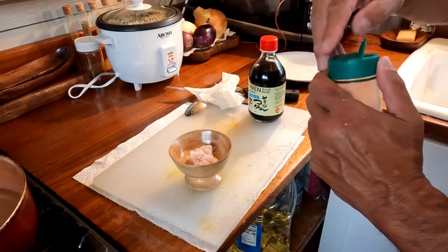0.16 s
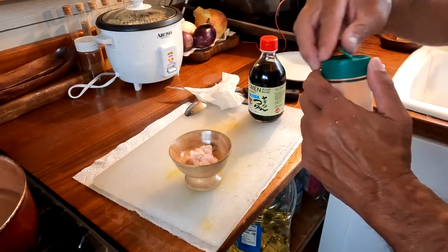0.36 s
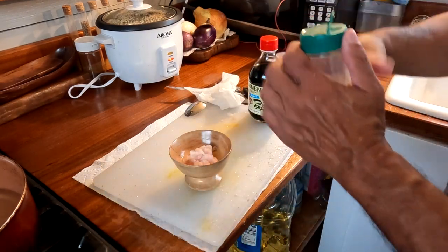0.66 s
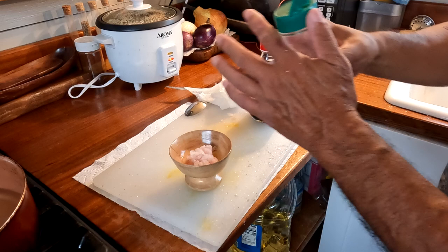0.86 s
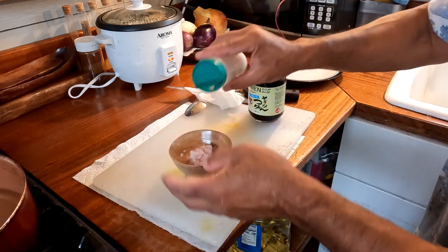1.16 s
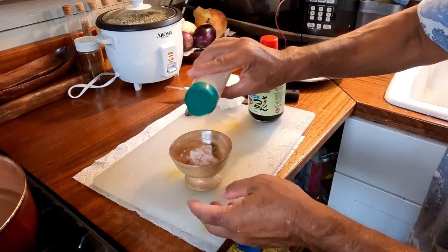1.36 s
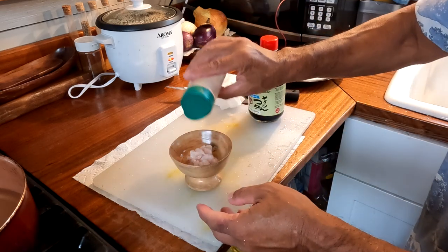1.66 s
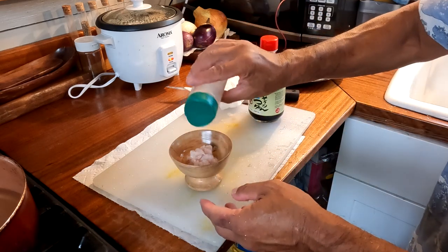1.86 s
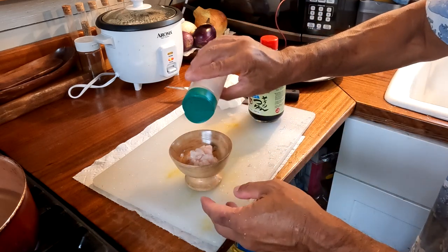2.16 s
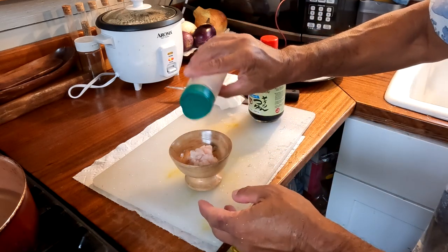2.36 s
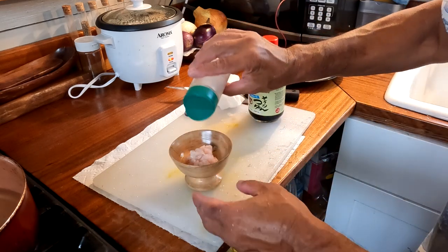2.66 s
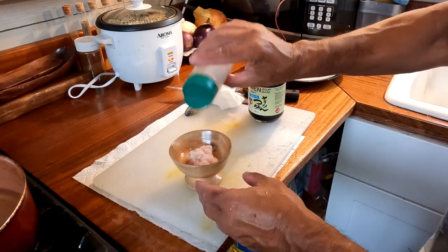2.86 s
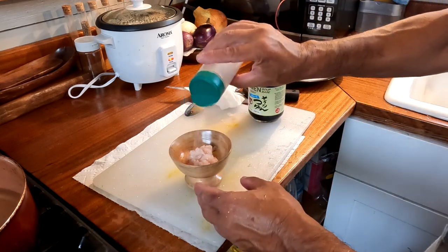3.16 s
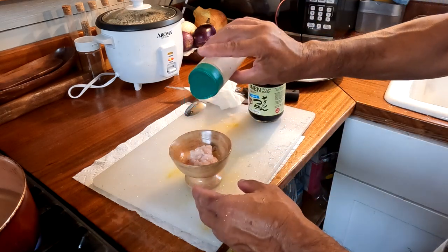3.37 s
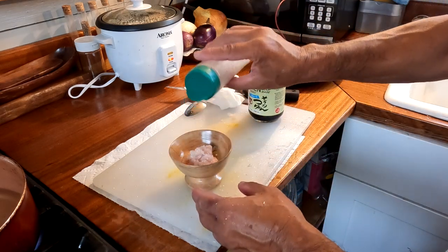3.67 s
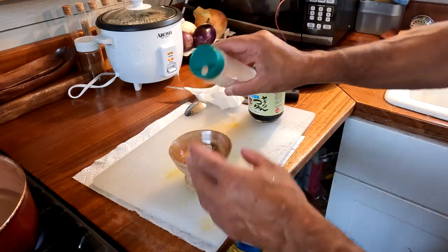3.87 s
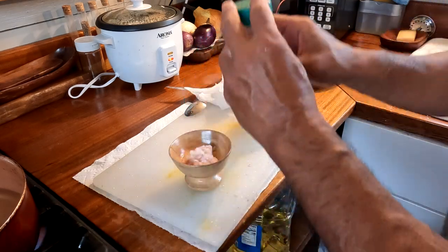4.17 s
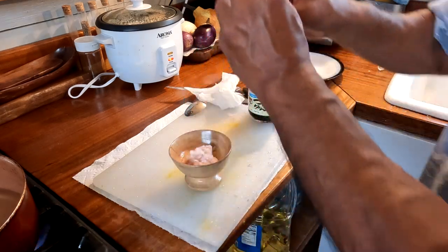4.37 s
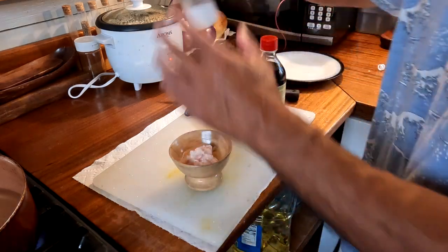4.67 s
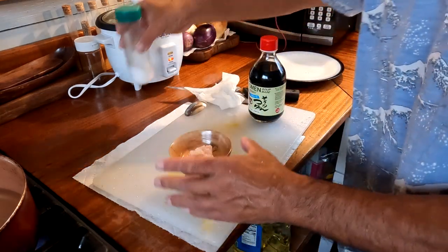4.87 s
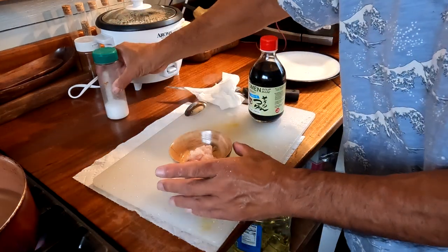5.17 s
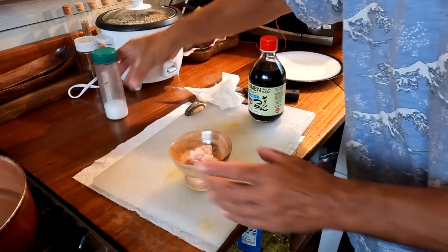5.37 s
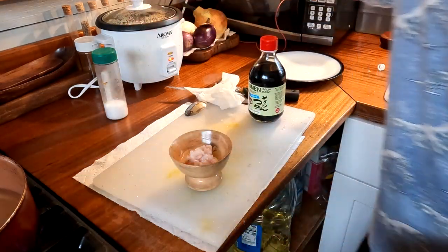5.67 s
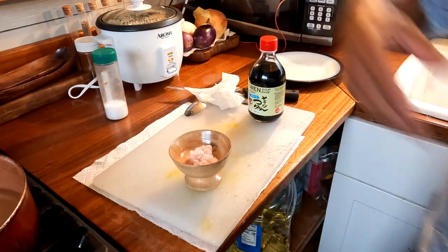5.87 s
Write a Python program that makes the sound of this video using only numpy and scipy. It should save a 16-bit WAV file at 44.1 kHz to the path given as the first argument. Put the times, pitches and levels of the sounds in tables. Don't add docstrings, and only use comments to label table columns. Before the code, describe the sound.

A close stereo microphone in a small, briefly echoing kitchen, over a steady low refrigerator hum, soft air and dull floor thuds. From 0 to 1 s, fingers handle a plastic salt shaker with slight grain shifts, faint clicks and a catch opening at 0.95. At 1.3 a bright rush of salt slides as it is tipped, then quick soft shakes patter until about 3.9, with small ticks and lumps, more pronounced after 3.2. At about 2.9 a deep bump swings and rattles the camera stand. Around 4.2 the salt swooshes back with soft finger taps; at 4.39 the lid snaps shut, the loudest, sharpest sound, with a burst of grains. Quieter handling follows, the level ducked. At 5.2 the tube lands on wood, a hollow rocking knock with a salt jolt. Light taps come near 5.6, barely audible sole squeaks at 5.8, and a hard clatter farther off at 6.02.

```python
import sys
import numpy as np
from scipy import signal
from scipy.io import wavfile
from scipy.ndimage import uniform_filter1d

SR = 44100
rng = np.random.default_rng(int(sys.argv[2]) if len(sys.argv) > 2 else 0)


def gain_from_decibels(decibels):
    exponent = np.asarray(decibels, float) / 20
    return 10 ** exponent


def waveform_to_disk(signal):
    frames = np.transpose(np.atleast_2d(signal))
    scaled = np.clip(frames, -1, 1) * 32767
    samples = np.round(scaled).astype(np.int16)
    wavfile.write(sys.argv[1], SR, samples)


N = 265923

# f/Hz, level/dB [dB per Hz]
PATTER = [(2650, -43.5), (4300, -16.5), (5250, -16), (6000, -6.5), (7240, 3), (7950, -0.5), (8720, -9.5),
          (9830, -17.5), (11100, -9), (11500, -9), (12600, -16), (14300, -28), (15500, -52)]
# f/Hz, level/dB [dB per Hz]
LID = [(250, -50), (420, -17), (702, -24), (1150, -14), (1300, -15), (1590, -10), (2110, 0), (2770, -4.5),
       (3800, 1.5), (5070, -16), (6860, 0.5), (7620, -6.5), (8860, -29), (10200, -27), (11800, -16),
       (13200, -24), (15000, -55)]
# t/s, gain/dB
GAIN = [
    (0.0, 0.4),
    (2.6, -0.3),
    (4.38, -1),
    (4.79, -7),
    (5.26, -5.5),
    (5.3, -12),
    (5.49, -9.5),
    (5.57, -6.5),
    (5.97, -6.5),
    (6.03, -14),
]
# t/s, deep level/dB, thud level/dB, die-away/s per 20 dB
STEPS = [(0.0, -55, -60, -0.2), (.4, -58, -56, .05), (.73, -63, -59, .05), (1.11, -60, -60, 0),
         (2.55, -56, -58, 0.05), (2.8, -54, -49.5, 0.09), (2.97, -37.5, -56, 0.15), (3.13, -43, -63, 0.04),
         (3.24, -57, -57, 0.04), (3.42, -46, -61, 0.2), (3.96, -51, -57.5, 0.24), (4.075, -60, -57, 0.09),
         (4.17, -53, -66, 0.4), (4.53, -56, -62, 0.2), (4.82, -48, -66, .2), (5.3, -44, -56.5, .2),
         (5.77, -49, -62, 0.2), (6.0, -44.5, -63, 0.2), (6.03, -38, -42, 0.05)]
STEP_RISE = .6


def salt():
    grain_tilts = [-9, 0, 9]
    # f/Hz, level/dB [dB per Hz]
    slide = [(500, -41.5), (900, -24), (1400, -14), (1900, -4.5), (2400, -6), (2900, -4.5), (4000, -6.5),
             (4600, -20), (5600, -30), (8000, -54)]
    ticking = np.zeros(N)
    for tilt in grain_tilts:
        clicks = grains(per_s=1700., spread_db=2.8)
        ticking += flutter(1.6, 900) * signal.oaconvolve(clicks, causal(tilted(PATTER, tilt)))[:N]
    patter_db, heap_db = motion()
    patter = gain_from_decibels(patter_db - 3.0) * flutter(1.3, 500) * ticking

    heap = grains(per_s=3300.0, spread_db=1.0)
    scrape = gain_from_decibels(heap_db - 1.5) * signal.oaconvolve(heap, causal(slide))[:N]
    rush_db = heap_db - 1.0 + 0.8 * np.clip(heap_db + 47.0, -30, 0)
    rush = gain_from_decibels(rush_db) * band(heap, 4330, 6300)

    tipped_s, grip_hz, grip_db = .95, 9500, -4.5
    top = signal.oaconvolve(patter, signal.firwin(101, grip_hz, pass_zero=False, fs=SR), "same")
    upright = np.arange(N) < tipped_s * SR
    patter = patter - (1 - gain_from_decibels(grip_db)) * upright * top
    top_hz = 14600
    patter = signal.oaconvolve(patter, signal.firwin(401, top_hz, window="blackman", fs=SR), "same")
    return patter + scrape + rush + air_column()


def air_column():
    start_hz, sag_hz_per_s, width_hz = 1910, 900, 60
    t = np.arange(N) / SR - 4.18
    pole = np.exp(-np.pi * width_hz / SR)
    waver = evened(signal.lfilter([1], [1, -pole], rng.standard_normal(N)))
    note = np.sin(2 * np.pi * t * (start_hz - sag_hz_per_s * t / 2))
    return gain_from_decibels(-50) * waver * note * np.exp(-(t / .08) ** 4)


def motion():
    # turning point t/s, patter level/dB, slide length/s
    shakes = [(1.04, -54.5, 0.08), (1.136, -57, 0.12), (1.426, -49, 0.006), (1.546, -50.5, 0.12),
              (1.734, -55.5, 0.019), (1.798, -52.5, 0.002), (1.898, -50, 0.032), (2.05, -51.5, 0.035),
              (2.119, -53, 0.041), (2.194, -54.5, 0.033), (2.274, -50, 0.005), (2.348, -52.0, 0.02),
              (2.429, -51.5, 0.003), (2.512, -51.0, 0.019), (2.592, -58, 0.007), (2.679, -50.5, 0.04),
              (2.817, -50.5, 0.02), (2.87, -56, 0.003), (2.991, -51.5, 0.049), (3.117, -50.5, 0.037),
              (3.173, -51.5, 0.029), (3.256, -52.5, 0.015), (3.423, -56, 0.046), (3.536, -54.5, 0.021),
              (3.609, -52.5, 0.02), (3.695, -59.5, 0.004), (3.754, -54.5, 0.002), (3.862, -58.5, 0.032)]
    # start t/s, patter level/dB, length/s
    trickle = (1.31, -63.5, 2.56)
    # peak t/s, patter level/dB, heap level/dB, swell and die-
    # away/s per 20 dB
    surges = [(0.0, -66, -58, 0.048, 0.07), (0.074, -54, -56, 0.008, 0.1), (0.097, -52, -55, 0.04, 0.05),
              (0.395, -68, -66, 0.006, 0.14), (0.672, -72, -65, 0.06, 0.08),
              (0.802, -63.0, -59.5, 0.12, 0.12), (1.312, -38.5, -48.5, 0.043, 0.16),
              (1.361, -48, -52, 0.08, 0.127), (2.869, -48.0, -47, 0.04, 0.1),
              (3.244, -67.5, -54, 0.1, 0.03), (4.038, -49.5, -50, 0.05, 0.39),
              (4.17, -33, -42, 0.1276, 0.108), (4.291, -46, -47, 0.008, 0.075),
              (4.349, -49.0, -55.5, 0.05, 0.045), (4.396, -31, -29, 0.008, 0.06),
              (4.436, -43, -44, 0.02, 0.045), (4.461, -60, -37.5, 0.006, 0.04),
              (4.605, -60.0, -58.5, 0.15, 0.078), (4.681, -61.5, -60.5, 0.014, 0.26),
              (4.887, -60.5, -61, 0.008, 0.07), (4.917, -55, -65.0, 0.037, 0.15),
              (5.048, -64.5, -54, 0.008, 0.08), (5.251, -34.5, -37, 0.0347, 0.05),
              (5.374, -70, -58, 0.015, 0.12), (5.768, -72, -67.5, 0.25, 0.13),
              (.989, -54, -59, .008, .12),
        (2.862, -54, -56, .008, .1),
        (5.203, -44, -50, .006, .09),
        (5.598, -74, -70, .01, .2),
        (5.69, -73, -67, .01, .2),
    ]
    rise_s, fall_s, stroke_heap_db = .079, 0.093, -8.5
    resting_db, resting_heap_db = -81, -74.5
    start, pour_db, length = trickle
    pour = (start + length / 2, pour_db, length)
    strokes = [(s, db, hold, rise_s, fall_s) for s, db, hold in shakes + [pour]]
    patter = list(strokes)
    heap = [(s, db + stroke_heap_db, *shape) for s, db, *shape in strokes]
    for s, patter_db, heap_db, rise, fall in surges:
        patter.append((s, patter_db, 0, rise, fall))
        heap.append((s, heap_db, 0, rise, fall))
    return swells(patter, resting_db), swells(heap, resting_heap_db)


def ticks():
    # t/s, peak level/dB, ring f/Hz, scuff t60/s
    pats = [(.0685, -40, 2100, .03), (.0745, -37, 2900, .04), (.08, -43, 3600, .03), (.092, -48, 2900, .02),
            (.413, -56, 2460, .01), (.7148, -46, 2210, .004), (.733, -45, 1930, .012),
            (4.164, -44, 2990, .05), (4.277, -31, 1830, .006), (4.2775, -36, 2400, .004),
            (4.279, -35, 1450, .01), (5.596, -55, 2290, .011), (5.63, -53.5, 3800, 0.02)]
    taps = [(.0345, -45.5, 3670, .002), (.2926, -54, 2970, .018), (.987, -50, 3500, .015),
            (1.005, -46, 4120, .005), (3.222, -51, 2500, .036), (3.2455, -42, 4100, .004),
            (3.48, -50, 4400, .004), (3.541, -50, 4300, .004), (3.794, -49, 4200, .004),
            (3.9717, -48, 3300, .006), (4.305, -44.5, 3480, .01), (4.552, -52, 1400, .051),
            (4.689, -49.5, 2100, .016), (4.884, -48, 2000, .008), (5.371, -54, 1100, .094),
            (5.685, -59, 3190, .033)]
    cracks = [
        (.945, -52, 2980, 0.015),
        (4.464, -34, 900, .05),
        (5.043, -47, 1490, .03),
    ]
    # t/s, peak level/dB
    lumps = [(.333, -57), (.393, -49), (.77, -56), (1.29, -38), (3.182, -41), (3.208, -44), (3.2455, -35),
             (3.27, -42), (3.395, -46), (3.435, -46), (3.503, -48), (3.511, -47), (3.71, -41), (3.748, -36),
             (3.864, -43.5), (3.9717, -47), (5.372, -54), (5.447, -60),
             (1.5533, -48),
        (1.8571, -50),
        (2.4164, -50),
        (2.5012, -45),
        (2.6379, -51),
        (2.9511, -48),
        (2.9856, -45),
        (3.0479, -54),
    ]
    pan_db = np.array([[-1.5], [1.5]])
    t = np.arange(2048) / SR
    lid = causal(LID)
    lid = lid / abs(lid).max()
    grain = causal(tilted(PATTER, 3))
    grain = grain / abs(grain).max() + gain_from_decibels(-9) * ring([(4250, 0, .006)])[:2048]
    grain = grain / abs(grain).max()
    lump_rows = [(s, db, 11200, .003) for s, db in lumps]
    kinds = [(pats, lid, -22), (taps, lid, -6), (cracks, lid, 0), (lump_rows, grain, 4)]
    sides = np.zeros((2, N))
    for rows, crack, crack_db in kinds:
        for s, db, hz, t60 in rows:
            body = gain_from_decibels(-60 * t / (.005 + .08 * t60)) * np.sin(2 * np.pi * hz * t)
            body += gain_from_decibels(crack_db) * crack
            add(sides, s, gain_from_decibels(db) * scuffed(body, t60) * gain_from_decibels(pan_db / 2))
    return sides


def lid_snap():
    # t/s, peak level/dB, scuff t60/s
    snaps = [
        (4.378, -50, .01),
        (4.3876, -6, 0.005),
        (4.389, -14, 0.0066),
        (4.3936, -13, 0.0034),
        (4.4105, -34, .006),
        (4.4605, -35, .008),
    ]
    # f/Hz, level/dB, t60/s
    lid_modes = [(1610, -10, .02), (2180, 0, .014), (2900, -6, .01), (3375, -3, .01), (4000, -1, .012),
                 (4320, -4, .012), (5900, -5, .015), (6300, -4, .015), (7010, -1, .018), (7400, -4, .015)]
    out = np.zeros(N)
    for s, db, t60 in snaps:
        add(out, s, gain_from_decibels(db) * scuffed(causal(LID), t60))
        add(out, s, gain_from_decibels(db - 7) * scuffed(ring(lid_modes), t60))
    return out


def tube_landing():
    # t/s, wood level/dB, plastic level/dB, scuff t60/s
    knocks = [
        (5.188, -52, -51, 0.026),
        (5.2003, -17.5, -22, .02),
        (5.208, -28, -17, .02),
        (5.2102, -25.5, -16, 0.012),
        (5.218, -25, -34, .04),
        (5.226, -23, -29, .03),
        (5.235, -27, -34, .03),
        (5.2447, -34.5, -32, 0.03),
    ]
    # f/Hz, level/dB, t60/s
    wood = [(138, -14, 0.15), (185, -8, 0.04), (293, 6, 0.1), (352, -18, 0.4), (423, 3, 0.045),
            (520, 2, .03), (620, -2, .03), (711, 0, 0.065), (942, -10, 0.04)]
    # f/Hz, level/dB [dB per Hz]
    tube = [(240, -15.5), (500, -8), (1200, -12), (1600, -14), (2020, -2), (2240, 0.5), (2600, -15),
            (3350, -5), (3900, -14), (4500, -30), (7100, -20.5), (9000, -40), (11600, -36), (15000, -55)]
    # f/Hz, level/dB, t60/s
    tube_modes = [(1640, -10, .03), (2030, -3, .03), (2240, -2, .025), (3260, 0, .03), (3460, -1, .03),
                  (3900, -5, .02)]
    out = np.zeros(N)
    for s, wood_db, tube_db, t60 in knocks:
        add(out, s, gain_from_decibels(wood_db) * scuffed(ring(wood), 0.35 * t60))
        add(out, s, gain_from_decibels(tube_db) * scuffed(causal(tube), t60))
        add(out, s, gain_from_decibels(tube_db - 10) * scuffed(ring(tube_modes), 0.4 * t60))
    return out


def palm_thumps():
    # t/s, peak level/dB, scuff t60/s
    thumps = [
        (.393, -50, .02),
        (.72, -54, .02),
        (4.037, -46, .03),
        (4.062, -40, .08),
        (4.11, -48, .05),
        (4.277, -45, .01),
        (4.389, -44, .02),
    ]
    # f/Hz, level/dB, t60/s
    hollow = [(190, -8, .04), (260, 0, .04), (350, -5, .03)]
    out = np.zeros(N)
    for s, db, t60 in thumps:
        add(out, s, gain_from_decibels(db) * scuffed(ring(hollow), t60))
    return out


def clatter():
    # t/s, peak level/dB
    rattles = [
        (6.018, -35),
        (6.023, -30.5),
    ]
    # f/Hz, level/dB [dB per Hz]
    tone = [(180, -44), (300, 1.5), (1320, 1.5), (3090, -8), (3350, -8), (5330, -32), (7240, -20),
            (8640, -40), (14000, -44.5)]
    out = np.zeros(N)
    for s, db in rattles:
        add(out, s, gain_from_decibels(db) * scuffed(causal(tone), 0.075))
    return out


def sole_squeaks():
    # t/s, f/Hz, level/dB
    squeaks = [
        (5.795, 7820, -78),
        (5.835, 8100, -80.5),
        (5.87, 7920, -77),
    ]
    t = np.arange(N) / SR
    out = np.zeros(N)
    for s, hz, db in squeaks:
        out += gain_from_decibels(db) * np.sin(2 * np.pi * hz * t) * np.exp(-((t - s) / .012) ** 2)
    return out


def stand_bump():
    # t/s, level/dB
    rattle_db = [
        (2.83, -56),
        (2.842, -65),
        (2.87, -31),
        (2.892, -37.5),
        (2.955, -62.5),
    ]
    # f/Hz, level/dB [dB per Hz]
    rattle_tone = [(59, -47), (100, 0), (198, -5), (310, 1), (414, -14.5), (536, -1.5), (604, -15),
                   (1060, -6.5), (2420, -16), (3100, -23), (3700, -32), (4600, -28), (6000, -45),
                   (7800, -65), (13200, -120)]
    # f/Hz, level/dB, centre t/s, half-length/s
    plate = [
        (307, -36, 2.895, .026),
        (522, -41, 2.888, .014),
        (1050, -46, 2.885, .02),
    ]
    t = np.arange(N) / SR
    swing = gain_from_decibels(-13.5) * np.cos(2 * np.pi * 30 * (t - 2.9)) * np.exp(-((t - 2.89) / 0.022) ** 2)
    shudder = gain_from_decibels(-51) * band(rng.standard_normal(N), 129, 165) * np.exp(-((t - 2.93) / 0.13) ** 2)
    head = np.zeros(N)
    for hz, db, s, half in plate:
        head += gain_from_decibels(db) * np.sin(2 * np.pi * hz * t) * np.exp(-((t - s) / half) ** 2)
    rattle = signal.oaconvolve(grains(per_s=1500.0, spread_db=2.0), causal(rattle_tone))[:N]
    inside = (t > rattle_db[0][0]) & (t < rattle_db[-1][0])
    lean = gain_from_decibels(np.array([[2.5], [-2.5]]))
    return swing + shudder + head + gain_from_decibels(curve(rattle_db)) * inside * rattle * lean


def refrigerator():
    hum_hz, hum_db = 59.16, -35
    hum = np.cos(2 * np.pi * hum_hz * np.arange(N) / SR + np.pi)
    return np.sqrt(2) * gain_from_decibels(hum_db + curve(GAIN)) * hum


def floor():
    resting_deep_db, resting_thuds_db, lumps_db = -64, -66, 1.5
    deep_rows = [(s, db, 0, STEP_RISE * fall, fall) for s, db, _, fall in STEPS]
    thud_rows = [(s, db, 0, STEP_RISE * fall, fall) for s, _, db, fall in STEPS]
    drift = uniform_filter1d(uniform_filter1d(rng.standard_normal(N), size=2000), size=2000)
    thuds_db = swells(thud_rows, resting_thuds_db) + lumps_db * evened(drift)
    deep = gain_from_decibels(swells(deep_rows, resting_deep_db)) * band(rng.standard_normal(N), 7, 45)
    return deep + gain_from_decibels(thuds_db) * band(rng.standard_normal(N), 58, 326)


def kitchen_air():
    # f/Hz, level/dB [dB per Hz]
    air_tone = [(47, -34.5), (80, -2.5), (91, -27.5), (124, -18), (173, -22.5), (202, -28), (230, -29.5),
                (581, -28), (678, -30.5), (1280, -33), (1870, -35), (3030, -48), (4710, -52), (6400, -52.5),
                (8600, -62), (10000, -65), (11800, -59), (13500, -62), (14500, -66), (15000, -85)]
    air_db, gain_share = -58.5, 0.15
    air = signal.oaconvolve(rng.standard_normal(N), causal(air_tone))[:N]
    return gain_from_decibels(air_db + gain_share * (curve(GAIN) + 2.5)) * ports(air)


def room(x):
    # f/Hz, t60/s
    decay = [(200, 0.22), (1000, 0.25), (3000, 0.19), (7000, 0.19), (12000, 0.091)]
    taps = np.zeros((2, SR // 2))
    at = np.arange(120, SR // 2 - 20, 20) + rng.integers(0, 20, (2, (SR // 2 - 121) // 20))
    np.put_along_axis(taps, at, rng.choice([-1., 1.], at.shape), 1)
    taps[1] = 0.53 * taps[0] + .5 * taps[1]
    hz, t, z = signal.stft(taps, SR, nperseg=256)
    tail = signal.istft(z * gain_from_decibels(-60 * t / read(decay, hz)[:, None]), SR, nperseg=256)[1]
    return signal.fftconvolve(x[None], tail / np.linalg.norm(tail[0]), axes=1)[:, :N]


def ports(x):
    # f/Hz, likeness [0..1]
    likeness = [(60, 0.33), (180, 0.81), (550, 0.73), (1650, 0.37), (4970, 0.75), (9000, .6), (15000, 0.2)]
    # f/Hz, level/dB
    leaning = [(60, -13.5), (180, -3), (550, -1), (1650, 1), (4970, -1), (15000, 5)]
    hz, _, z = signal.stft(x, SR, nperseg=256)
    same = np.clip(read(likeness, hz), 0, 1)[:, None]
    wander = uniform_filter1d(rng.standard_normal(z.shape), size=3, axis=1)
    turn = np.arccos(same) * 0.58 * np.sign(wander)
    lean = gain_from_decibels(read(leaning, hz) / 2)[:, None]
    sides = [z * np.exp(1j * turn) * lean, z * np.exp(-1j * turn) / lean]
    return signal.istft(sides, SR, nperseg=256)[1][:, :N]


def grains(per_s, spread_db):
    size = gain_from_decibels(spread_db * np.minimum(rng.exponential(1, N), 5)) * rng.choice([-1., 1.], N)
    return evened(size * (rng.random(N) < per_s / SR))


def flutter(db, size):
    return gain_from_decibels(db * evened(uniform_filter1d(rng.standard_normal(N), size=size)))


def scuffed(body, t60):
    spray = rng.standard_normal(3000) * gain_from_decibels(-60 * np.arange(3000) / SR / max(t60, .002))
    out = signal.fftconvolve(spray, body)
    return out / abs(out).max()


def ring(modes):
    t = np.arange(20000) / SR
    out = sum(gain_from_decibels(db - 60 * t / t60) * np.sin(2 * np.pi * hz * t) for hz, db, t60 in modes)
    out = out * (1 - np.exp(-(t / .0003) ** 2))
    return out / abs(out).max()


def swells(rows, rest_db):
    t = np.arange(0, N + 32, 32) / SR
    s, db, hold, rise, fall = np.transpose(rows)[..., None]
    away = np.maximum(np.maximum((s - hold / 2 - t) / rise, (t - s - hold / 2) / fall), 0)
    power = (gain_from_decibels(db - 20 * away) ** 2).sum(0) + gain_from_decibels(rest_db) ** 2
    return np.interp(np.arange(N) / SR, t, 10 * np.log10(power))


def causal(points):
    level_db = read(points, abs(np.fft.fftfreq(4096, 1 / SR)))
    log_gain = np.log(gain_from_decibels(np.maximum(level_db, -70)))
    taps = np.fft.ifft(np.exp(np.conj(signal.hilbert(log_gain)))).real[:2048]
    return taps / np.linalg.norm(taps)


def tilted(points, db_per_octave):
    return [(hz, db + db_per_octave * np.log2(hz / 9000)) for hz, db in points]


def band(x, lo_hz, hi_hz):
    return evened(signal.sosfilt(signal.butter(4, [lo_hz, hi_hz], "band", fs=SR, output="sos"), x))


def evened(x):
    return x / np.sqrt(np.mean(x ** 2) + 1e-20)


def read(points, hz):
    f, value = np.transpose(points)
    return np.interp(np.log(hz + 1), np.log(f + 1), value)


def curve(points):
    s, value = np.transpose(points)
    return np.interp(np.arange(N) / SR, s, value)


def add(mix, s, sound):
    part = mix[..., round(s * SR):][..., :sound.shape[-1]]
    part += sound[..., :part.shape[-1]]


def scene():
    grit, clicks = salt(), ticks()
    hits = lid_snap() + tube_landing() + palm_thumps() + clatter() + sole_squeaks()
    wet = room(gain_from_decibels(-13.5) * grit + gain_from_decibels(-4) * clicks.mean(0) + gain_from_decibels(-7.5) * hits)
    spread = gain_from_decibels(-12) * (np.roll(hits, 9) - np.roll(hits, 12)) * np.array([[1], [-1]])
    near = ports(gain_from_decibels(-2.0) * grit) + clicks + hits + spread
    return near + wet + stand_bump() + refrigerator() + floor() + kitchen_air()


def top_cut(x):
    return signal.sosfilt(signal.butter(12, 15640, fs=SR, output="sos"), x)


def record(dry):
    rounded = .75 * np.tanh(dry / .75)
    return top_cut(rounded)


dry = scene()
out = record(dry)
waveform_to_disk(out)
```